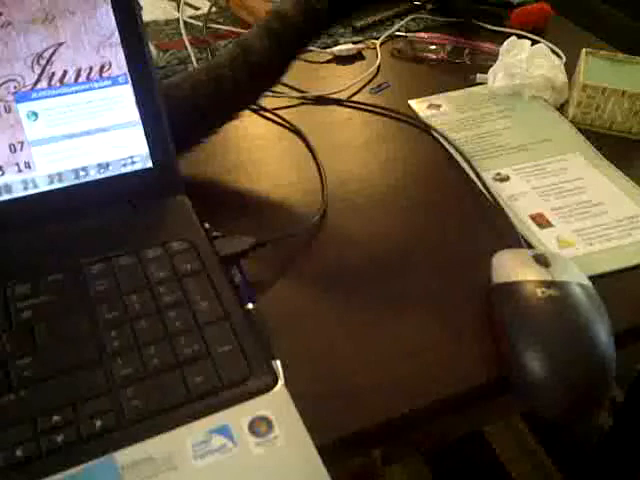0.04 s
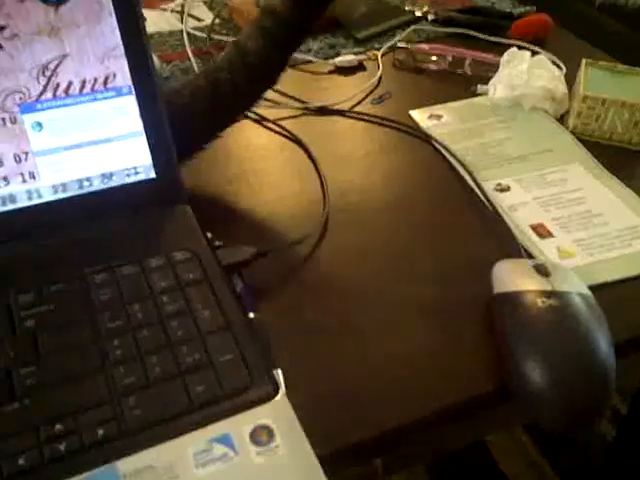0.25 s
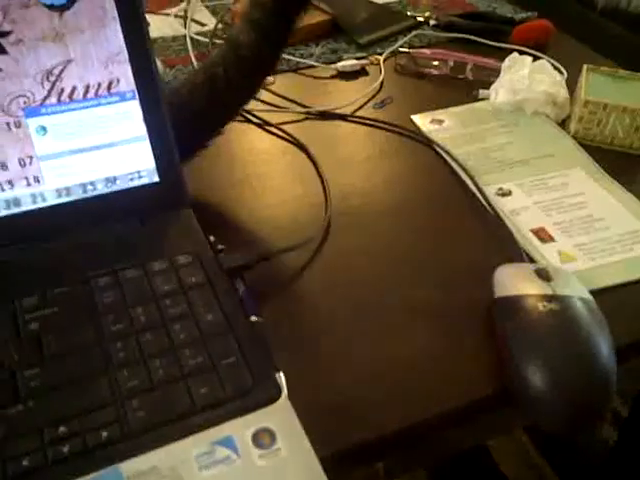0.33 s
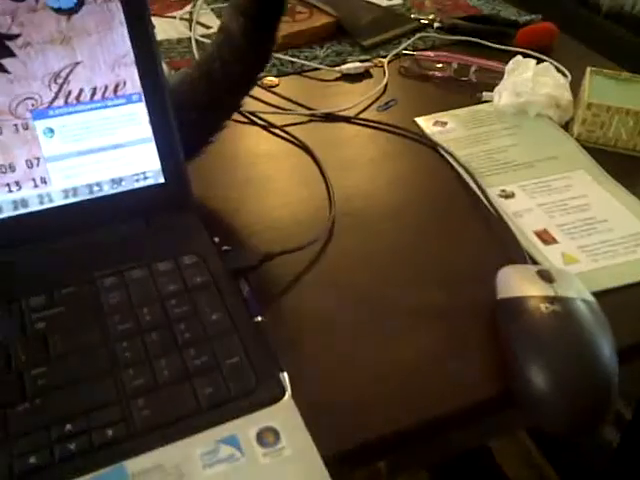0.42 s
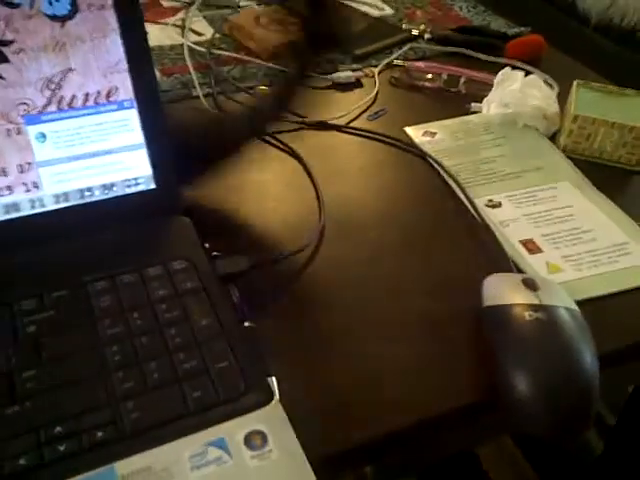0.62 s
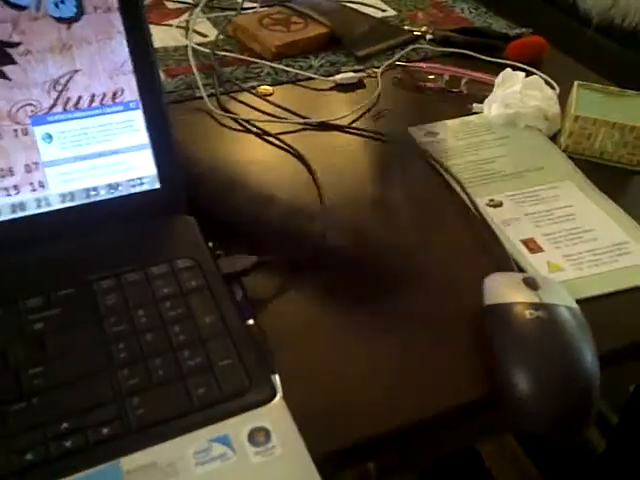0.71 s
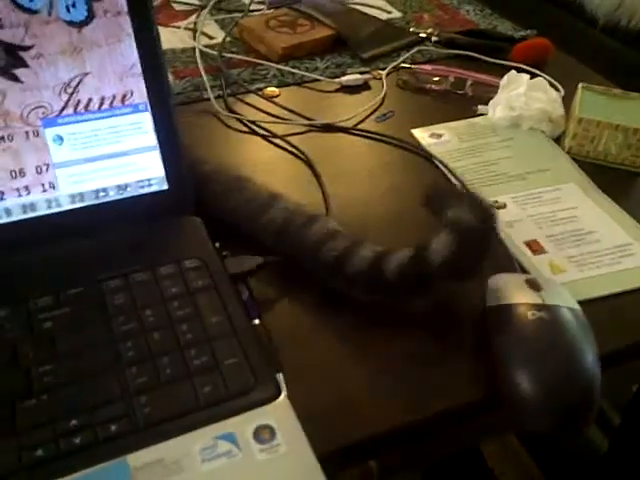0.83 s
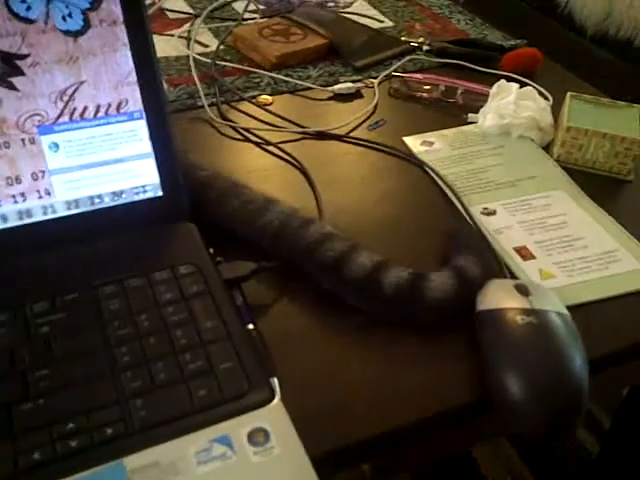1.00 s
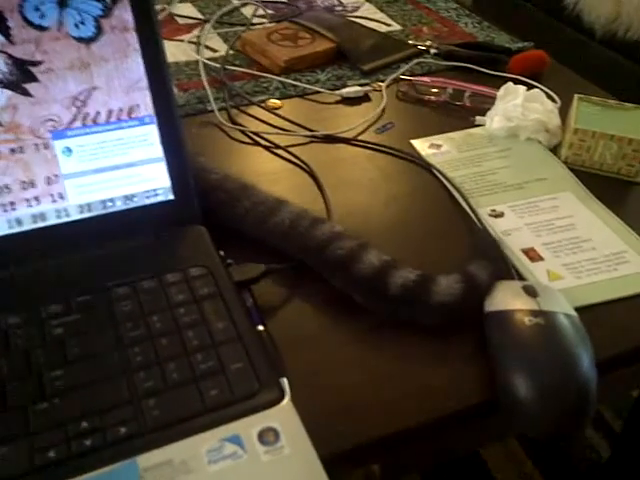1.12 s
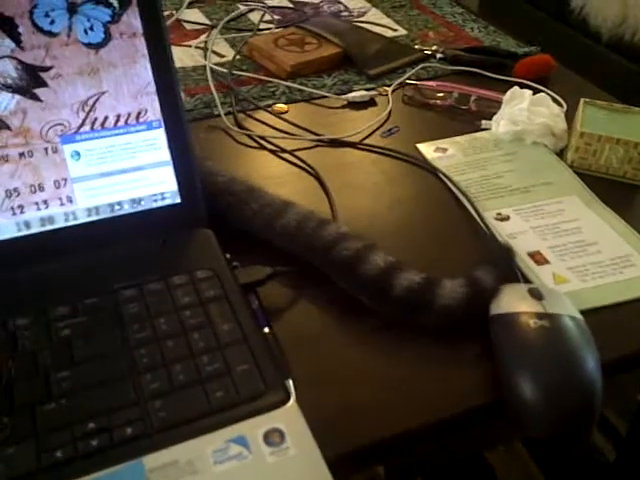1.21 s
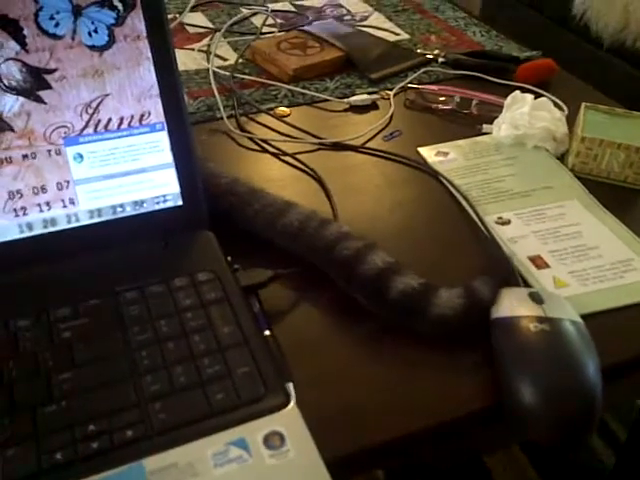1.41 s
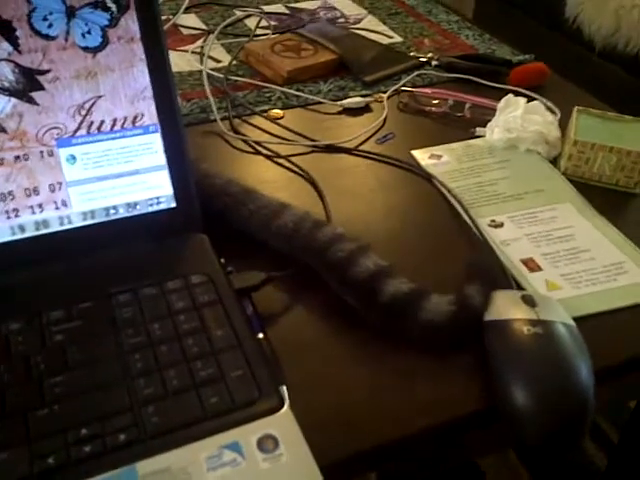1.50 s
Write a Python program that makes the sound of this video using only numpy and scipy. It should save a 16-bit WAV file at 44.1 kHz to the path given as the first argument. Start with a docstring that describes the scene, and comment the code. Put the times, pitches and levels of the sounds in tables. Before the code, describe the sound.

A cat's tail thumps softly on a desk in a quiet room. The microphone pops on at 0.2 seconds, bringing in faint fan noise. Low thumps run from about 0.5 to 1.3 seconds, the strongest near 0.6. From 0.7, fur brushes faintly over the wood, with a tiny tick against cables. Something plastic clicks at 0.8 seconds with a short echo.

```python
"""Cat's tail on a desk.

A quiet room with a faint fan. The microphone comes on with a pop; the tail thumps the desk top softly
and flops a few more times. Its fur brushes the wood and ticks against cables. Something plastic
clicks once, with a short echo from the room."""
import sys
import numpy as np
from scipy import signal
from scipy.fft import rfft, irfft
from scipy.io import wavfile
from scipy.ndimage import uniform_filter1d

SR = 44100
rng = np.random.default_rng(int(sys.argv[2]) if len(sys.argv) > 2 else 0)


def wrap_up_sound(samples):
    """Save the sound to the file named by the first command line argument, as 16-bit audio."""
    columns = np.atleast_2d(samples).T
    # keep every value between -1 and 1, then stretch to whole-number steps
    tamed = np.clip(columns, -1, 1)
    steps = np.round(tamed * 32767).astype(np.int16)
    wavfile.write(sys.argv[1], SR, steps)


N = 68355
T = np.arange(N) / SR

# room noise spectrum: f/Hz, level/dB
AIR_SPECTRUM = [(20, -15), (60, -8), (150, -.5), (300, -3.5), (500, -7), (800, -8), (1150, -8.5),
                (1600, -12), (2350, -14.5), (2900, -21), (4200, -25.5), (6300, -32), (8000, -27)]
# fan tones: f/Hz, level/dB
FAN_TONES = [(851, -82), (1130, -76.5), (1427, -85.5)]
# echo spectrum: f/Hz, level/dB
ECHO_SPECTRUM = [(60, -25), (150, 4), (400, 5), (1000, 6), (1600, -2), (3000, -6), (4500, -7), (6000, -9.5),
                 (7000, -20)]
# diffuse echo decay: f/Hz, t60/s
ECHO_DECAY = [(300, .36), (1000, .33), (2500, 0.63), (6000, 0.47)]
# fur envelope: t/s, level/dB
FUR_ENVELOPE = [(.68, -100), (.74, -75.5), (1.0, -88), (1.12, -78), (1.2, -89.5), (1.55, -81)]
# fur spectrum: f/Hz, level/dB
FUR_SPECTRUM = [(300, -9.5), (2000, -2.5), (4500, -1.5), (7000, -2)]
# cable contacts: t/s, level/dB
CABLE_HITS = [(0.7311, -48.5), (0.7363, -53.5)]
# cable modes: f/Hz, level/dB, t60/s
CABLE_MODES = [(1000, -5.5, .006), (2240, -6.5, 0.0047), (3260, -7, 0.0041), (4450, 1.5, 0.0036),
               (4900, -10, 0.0018), (6600, -5, 0.0033)]
# filter rounding the pop's edges: f/Hz, level/dB
POP_FILTER = [(1000, 1.5), (2000, -1.35), (3200, -3.5), (4000, -6.5), (5000, -9), (6300, -14.5),
              (7200, -15), (8000, -22)]
# plastic contacts: t/s, level/dB
PLASTIC_HITS = [(0.8205, -39), (0.8227, -42.5)]
# shell modes: f/Hz, level/dB, t60/s
PLASTIC_MODES = [(422, -1.5, 0.046), (578, -7, .03), (812, -4.5, 0.059), (1210, -7, 0.034),
                 (1635, -2.5, 0.03), (2080, -1.5, 0.027), (2940, 1, 0.011), (3390, -4.5, 0.015),
                 (4430, -11, .012), (5240, -10.5, 0.024), (5650, -21.5, 0.02), (6030, -17, 0.013)]
# crack spectrum: f/Hz, level/dB
CRACK_SPECTRUM = [(60, -29), (300, -1), (500, 1), (2500, 11.5), (4000, -4), (6500, -14)]
# tail on desk: t/s, level/dB, contact/s, t60/s
TAIL_HITS = [(0.4772, -50, 0.0022, 0.042), (0.6244, -53.5, 0.0025, 0.089), (0.6371, -35.5, 0.0064, 0.047),
             (0.7233, -51.5, .003, 0.061), (0.8245, -49.5, 0.0066, 0.12), (0.8932, -41, 0.0022, 0.11),
             (1.0689, -47, 0.006, 0.063), (1.1135, -47.5, 0.0012, 0.077), (1.2315, -51, 0.0022, .03),
             (1.2541, -50.5, .003, 0.067)]
# desk modes: f/Hz, level/dB, share of the hit's t60
DESK_MODES = [(159.3, 0, 0.98), (120, -16.5, 0.32), (196, -17.5, 0.51), (319.5, -12, 0.5), (532, -22, .4)]
# microphone treble response: f/Hz, level/dB
MIC_RESPONSE = [(5500, -0.5), (6400, -0.5), (7000, -7), (7600, -13), (8300, -24)]

MIC_ON_S = .19262
LN_1000 = np.log(1000)  # 60 dB of decay
RING_T = T[:SR // 2]


def amp(db):
    """Decibels to gain."""
    return 10 ** (np.asarray(db) / 20)


def unit_rms(x):
    """Scales to rms 1."""
    return x / np.sqrt(np.mean(x ** 2) + 1e-20)


def lookup(table, hz):
    """Interpolates on a log-frequency axis."""
    table_hz, value = np.transpose(table)
    return np.interp(np.log(hz + 1), np.log(table_hz + 1), value)


def colour(x, spectrum):
    """Zero-phase filter from a table of f/Hz, level/dB."""
    size = 2 * len(x)
    gain = amp(lookup(spectrum, np.fft.rfftfreq(size, 1 / SR)))
    return irfft(rfft(x, size) * gain, size)[:len(x)]


def add(mix, start_s, sound):
    """Mixes a sound in at start_s."""
    part = mix[round(start_s * SR):][:len(sound)]
    part += sound[:len(part)]


def ring(modes, t60_scale=1):
    """Damped sines of a struck object."""
    return sum(amp(db) * np.exp(-LN_1000 * RING_T / (t60 * t60_scale)) * np.sin(2 * np.pi * hz * RING_T)
               for hz, db, t60 in modes)


def air_and_fan(air_db=-64, waver_rms_hz=3):
    """Steady room noise and a thin, wavering fan whine."""
    out = amp(air_db) * unit_rms(colour(rng.standard_normal(N), AIR_SPECTRUM))
    for hz, db in FAN_TONES:
        waver_hz = waver_rms_hz * unit_rms(uniform_filter1d(rng.standard_normal(N), size=2000))
        phase = 2 * np.pi * np.cumsum(hz + waver_hz) / SR
        out += amp(db) * unit_rms(np.sin(phase))
    return out


def room_echo(x, delay_s=.0145, diffuse_db=-1, early_db=-3.5, early_tau_s=.011):
    """Early reflections plus a diffuse decay."""
    size = len(RING_T)
    hz, frame_s, bands = signal.stft(rng.standard_normal(size), SR, nperseg=256)
    decay = np.exp(-LN_1000 * frame_s / lookup(ECHO_DECAY, hz)[:, None])
    diffuse = signal.istft(bands * decay, SR, nperseg=256)[1][:size]
    early = rng.standard_normal(size) * np.exp(-RING_T / early_tau_s)
    response = amp(diffuse_db) * diffuse / np.linalg.norm(diffuse)
    response += amp(early_db) * early / np.linalg.norm(early)
    out = np.zeros(N)
    add(out, delay_s, signal.fftconvolve(x, colour(response, ECHO_SPECTRUM)))
    return out


def fur_hiss():
    """Fur sliding over the desk."""
    envelope = amp(np.interp(T, *np.transpose(FUR_ENVELOPE)))
    return envelope * unit_rms(colour(rng.standard_normal(N), FUR_SPECTRUM))


def cable_ticks():
    """The tail brushes cables: tiny dry contacts."""
    out = np.zeros(N)
    for start_s, db in CABLE_HITS:
        add(out, start_s, amp(db) * ring(CABLE_MODES))
    return out


def switch_on_pop(drop_db=-26, sag_db=-11, sag_power=2.93, sag_s=.00328, coupling_hz=(88, 62)):
    """The mic's offset voltage drops, sags and snaps back; two coupling stages drain it."""
    progress = np.clip((T - MIC_ON_S) / sag_s, 0, 1)
    sagging = (progress > 0) & (progress < 1)
    offset = -(amp(drop_db) + amp(sag_db) * progress ** sag_power) * sagging
    for hz in coupling_hz:
        offset = signal.lfilter(*signal.butter(1, hz, "high", fs=SR), offset)
    return colour(offset, POP_FILTER)


def plastic_click(crack_db=-4.5, crack_tau_s=.0057):
    """A hard contact cracks and rings a plastic shell, then catches again."""
    out = np.zeros(N)
    for start_s, db in PLASTIC_HITS:
        crack = amp(crack_db) * np.exp(-RING_T / crack_tau_s) * rng.standard_normal(len(RING_T))
        add(out, start_s, amp(db) * (ring(PLASTIC_MODES) + colour(crack, CRACK_SPECTRUM)))
    return out


def crack_impulse(boost_db=26.5):
    """The shell's first crack as it enters the room: one sharp pulse."""
    out = np.zeros(N)
    start_s, db = PLASTIC_HITS[0]
    out[round(start_s * SR)] = amp(db + boost_db)
    return out


def tail_thumps():
    """The furry tail presses on the desk top; longer contact builds the ring more gently."""
    out = np.zeros(N)
    for start_s, db, contact_s, t60_s in TAIL_HITS:
        attack = 1 - np.exp(-(RING_T / contact_s) ** 2)
        makeup = np.exp(LN_1000 * contact_s / t60_s)  # offsets decay during contact
        add(out, start_s, -amp(db) * attack * makeup * ring(DESK_MODES, t60_s))
    return out


def scene(click_send_db=-19, thump_send_db=-22.5):
    """Mono mix; only click and thumps feed the echo."""
    thumps, click = tail_thumps(), plastic_click()
    echo = room_echo(crack_impulse() + amp(click_send_db) * click + amp(thump_send_db) * thumps)
    return (thumps + click + cable_ticks() + fur_hiss() + air_and_fan() + echo)[None]


def record(dry):
    """Silent until the microphone pops on; dull treble, band limit."""
    live = colour(dry[0] * (T > MIC_ON_S) + switch_on_pop(), MIC_RESPONSE)
    lowpass = signal.firwin(255, cutoff=7900, window=("kaiser", 8), fs=SR)
    return signal.oaconvolve(live, lowpass, "same")[None]


dry = scene()
out = record(dry)
wrap_up_sound(out)
```